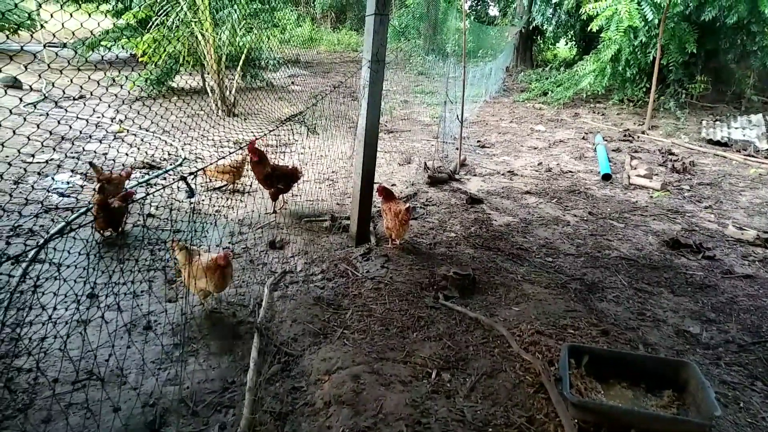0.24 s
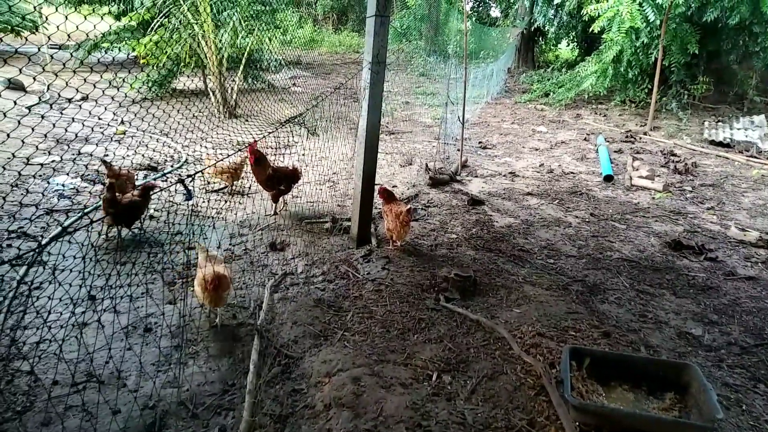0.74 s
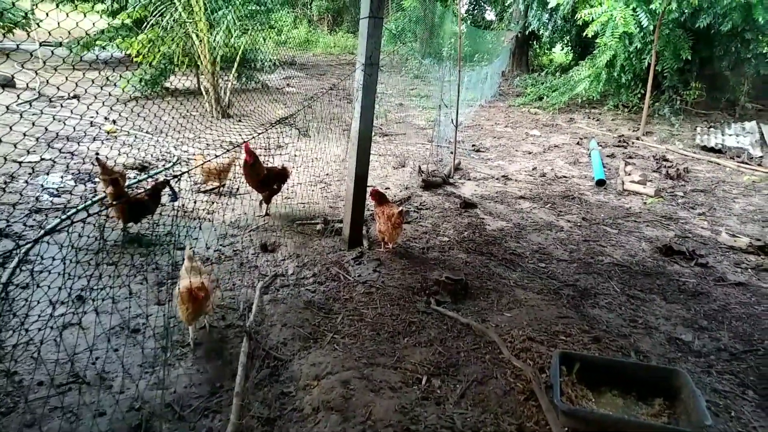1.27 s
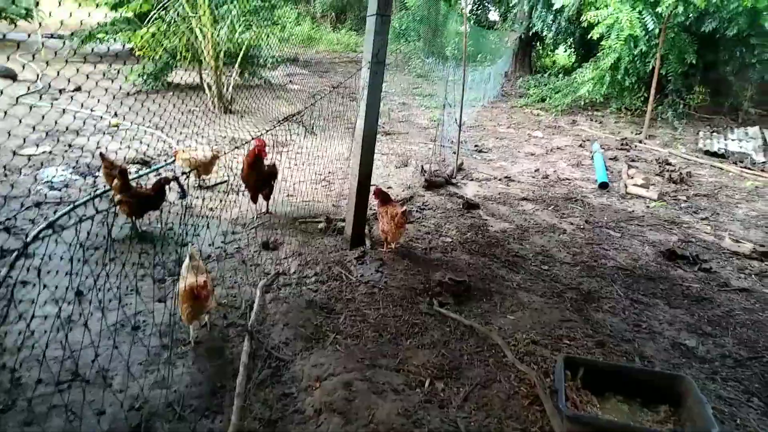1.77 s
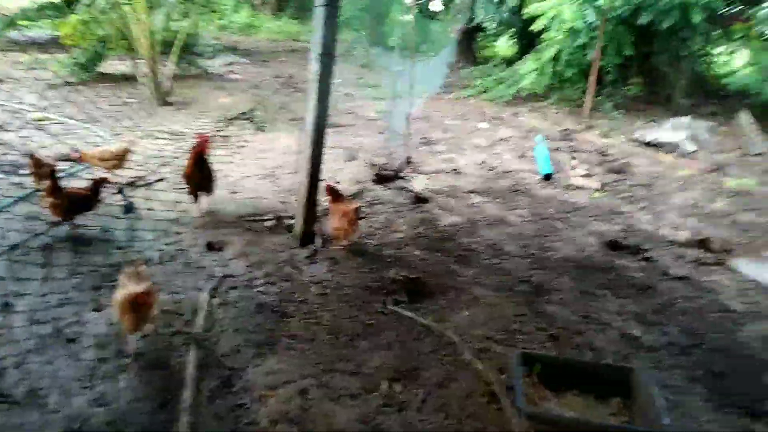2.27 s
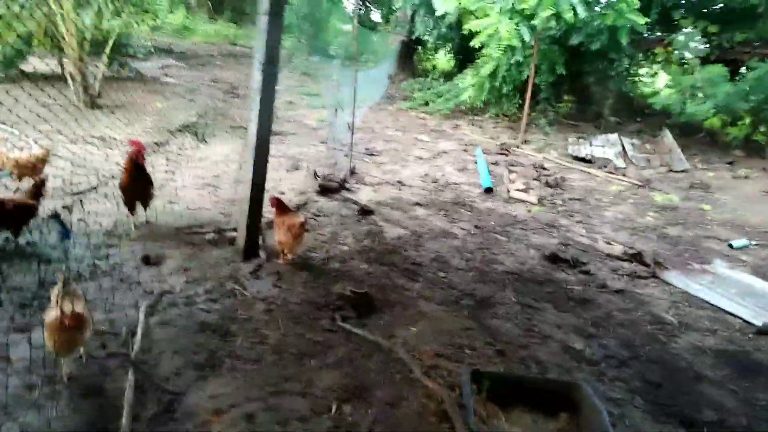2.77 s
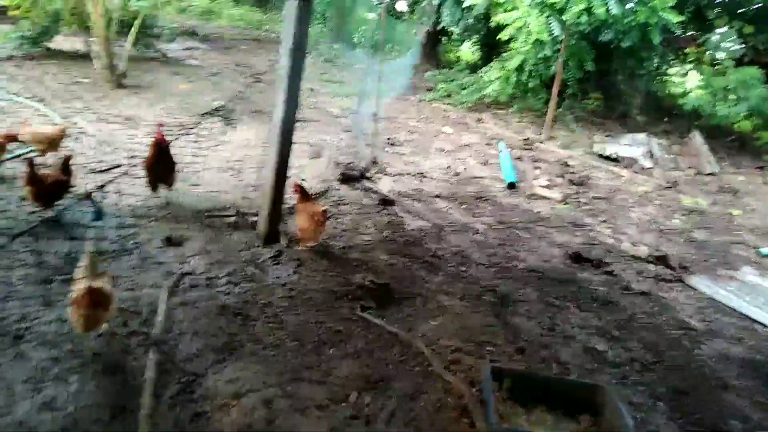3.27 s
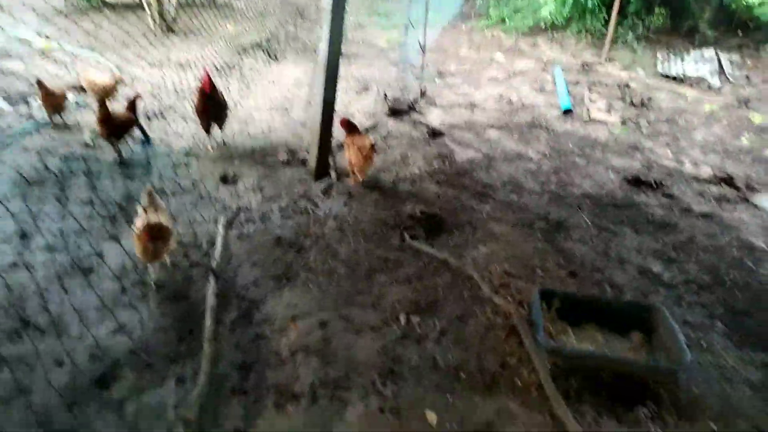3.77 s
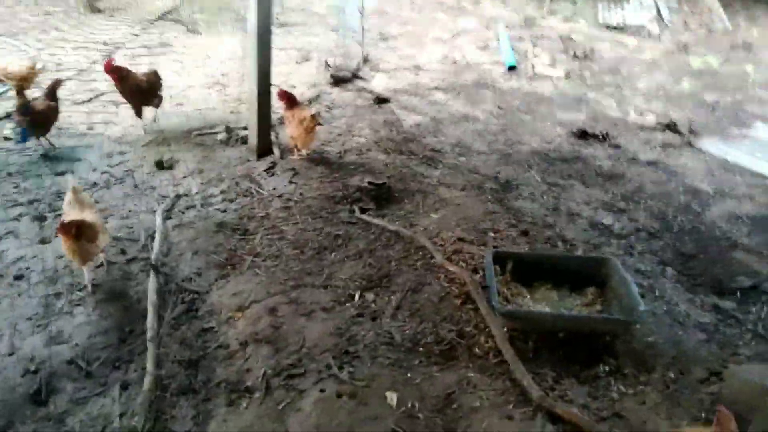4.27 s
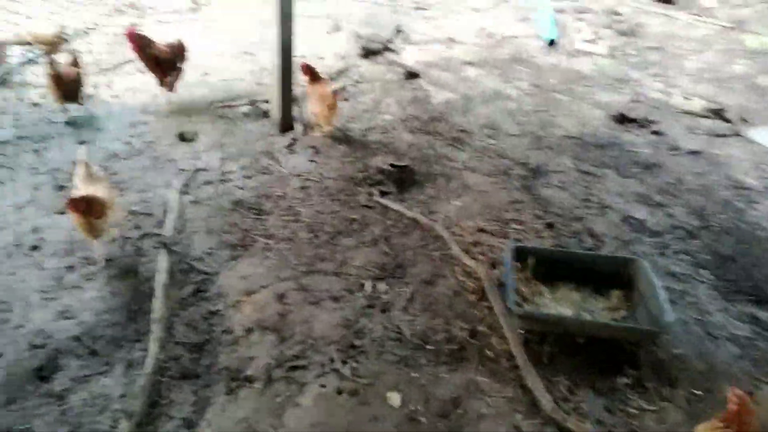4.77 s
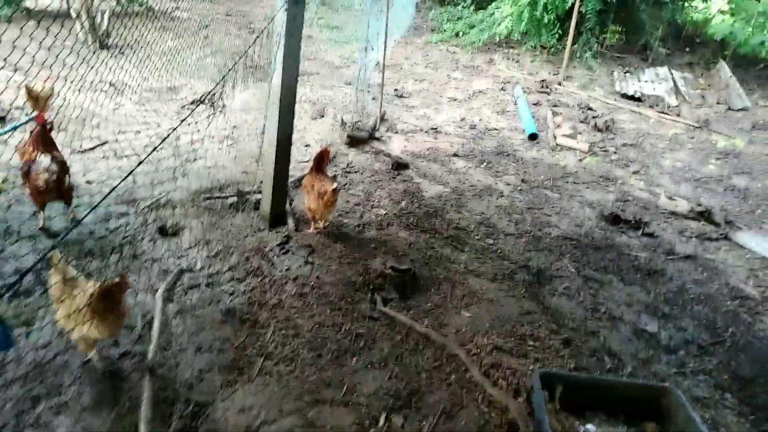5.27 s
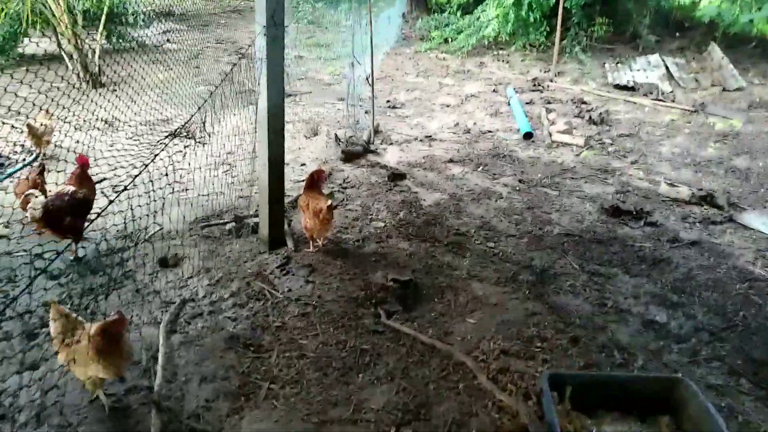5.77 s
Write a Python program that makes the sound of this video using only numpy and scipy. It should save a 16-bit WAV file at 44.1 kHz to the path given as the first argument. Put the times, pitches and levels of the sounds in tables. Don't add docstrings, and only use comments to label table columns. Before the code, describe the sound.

Distant hens whine and cluck amid insect chirps, pecks rattle on dirt, sound cuts out briefly, then two close hens squawk harshly.

```python
import sys
import numpy as np
from scipy import signal
from scipy.fft import rfft, irfft, next_fast_len
from scipy.io import wavfile
from scipy.ndimage import uniform_filter1d

SR = 44100
rng = np.random.default_rng(int(sys.argv[2]) if len(sys.argv) > 2 else 0)


def transcribe(u):
    v = np.clip(np.atleast_2d(u).T, -1, 1)
    q = np.round(v * 32767).astype(np.int16)
    wavfile.write(sys.argv[1], SR, q)


def invert_db(level):
    return 10 ** (np.asarray(level, dtype=float) / 20)


N = 266364

# start_s, end_s
SCENE_CHANGE = (5.158, 5.31)
LEAD_SAMPLES = 8
SIDES = np.array([[.5], [-.5]])

# frequency_hz, level_db (per Hz)
CICADAS = [(2900, -55.5), (3400, -38), (3800, -36), (4050, -8.5), (4460, -6), (5060, -4), (5500, -13),
           (6050, -15), (6500, 4.5), (7050, 2.5), (7700, -13), (8300, -26), (9300, -22), (12500, -39),
           (15200, -44)]
RUMBLE = [(50, -31.5), (80, 2.5), (140, 0.5), (220, -6), (320, -18.5), (500, -55)]
YARD = [(150, -38.5), (250, -8), (409, -11), (629, -6), (968, -11.5), (1060, -7), (1500, -9.5), (2900, -13),
        (3500, -24), (6380, -120)]
# frequency_hz, likeness (0-1)
LIKENESS = [(60, 0.16), (600, 0.51), (1500, 0.46), (6000, 0.3)]
# rest_db, rest_after_change_db, loudness_that_starts_it_db, rise_db_per_db
CICADA_RISE = (-70, -67.5, -65.5, 0.353)
RUMBLE_RISE = (-82.5, -78, -57, 0.378)
YARD_RISE = (-81, -70, -70, 0.4704)
# start_s, length_s, level_db
SCUFF = (5.03, .13, -71)

# start_s, rise_s, peak_db, start_pitch_hz, peak_pitch_hz, upward_spread_hz
CHIRPS = [
    (0.502, 0.024, -53.5, 5300, 5440, 806),
    (0.606, 0.06, -61, 4620, 4680, 30),
    (1.371, 0.033, -48, 5660, 5685, 900),
    (2.28, .03, -47, 5400, 5544, 805),
    (3.574, 0.087, -53.5, 4100, 5540, 250.8),
]
# start_s, peak_db, treble_db, bass_db, left_minus_right_db
KNOCKS = [
    (4.468, -40, -11, -30, 9),
    (4.527, -43, -30, 4, -1),
    (4.536, -31.5, -28, -19, -7),
    (4.542, -31.5, -28.5, -29, 13),
    (4.553, -21.5, -19.5, -27, -5),
    (4.558, -30.5, -22, -33, 22.5),
    (4.571, -32.5, -23, -40.5, -5),
    (4.591, -56, -21, -30, 5),
    (5.001, -40.5, -30, 3.5, 11.5),
]
SQUEAK_S = (3.64, 3.86, 3.95, 3.975)
SQUEAK_HZ = (1250, 1680, 1440, 1270)
# start_s, top_s, end_s, level_db
AFTER_HISS = (4.0, 4.2, 4.33, -82)
# start_s, peak_db, throat_hz, t60_s,
# left_minus_right_db
CLUCKS = [(0.004, -56, 923, 0.091, 4.5), (0.519, -39.5, 1095, 0.095, 6), (0.745, -36.5, 1680, 0.065, 5.5),
          (0.787, -44.5, 1470, 0.13, 4), (0.82, -30, 1450, 0.037, 2.5), (0.994, -44.5, 1340, 0.12, 5),
          (1.568, -50.5, 960, 0.1, 0), (1.755, -42, 1036, 0.12, 5.5), (1.822, -47, 2040, 0.096, 5),
          (1.914, -50.5, 1050, 0.16, 7.5), (2.409, -34, 1010, 0.16, 3.5), (2.466, -46, 1220, 0.085, -1),
          (2.535, -43.5, 1730, 0.11, 1), (2.689, -36, 1036, 0.13, 3), (3.174, -52.5, 996, 0.21, 10.5),
          (3.218, -48.5, 732, 0.16, 1), (3.249, -71, 648, 0.22, 1.5), (3.668, -53.5, 1870, 0.12, 8),
          (3.818, -61, 2260, 0.37, 13.5), (3.898, -56.5, 1750, 0.16, 8), (4.038, -62.5, 594, 0.064, -1),
          (4.054, -56, 760, 0.055, -1), (5.109, -52, 1210, 0.1, 8.5), (1.15, -62, 1820, 0.23, 9),
          (4.47, -46, 324, 0.021, 4)]

# frequency_hz, level_db
FAR_THROAT = [(300, -28), (530, -14.5), (785, -18.5), (1050, -0.5), (1580, -6), (2040, -25), (2150, -12),
              (2650, -26.5), (3200, -36), (3650, -52), (4200, -23), (4800, -43.5), (6800, -37), (8500, -63),
              (13000, -71)]
DEEP_THROAT = [(280, -27), (550, -8), (830, -8), (1100, 0), (1380, -4), (1650, -17), (2490, -26),
               (2770, -52), (3335, -18), (3900, -23), (4800, -29), (5250, -52), (5700, -30), (6800, -25),
               (8200, -42), (10000, -49), (13000, -54), (15000, -56)]
NEAR_THROAT = [(400, -20.5), (830, -5.5), (1250, 0), (1670, -18.5), (2100, -17), (2450, -26), (2780, -46.5),
               (3400, -24.5), (3850, -12.5), (4300, -25.5), (4800, -30), (5250, -48.5), (5750, -32),
               (6800, -27), (8200, -42.5), (10500, -57.5), (15000, -59.5)]
# frequency_hz, left_lag_radians
NO_LAG = [(100, 0), (8000, 0)]
DEEP_LAG = [(300, 0.6), (550, 0.32), (830, 1.56), (1100, 1.5), (1380, 1.07), (1900, 1.2), (3500, -1)]
HOARSE_LAG = [(400, 1.1), (830, 0.82), (1250, 0.94), (2100, 1.9), (3800, -1.3)]

# start_s, length_s, pitch_hz, high_partial_db, high_minus_low_partial_db
FAR_HEN = [
    (.72, 0.095, 589, -64.5, -3),
    (1.56, 0.22, 605.5, -58.5, 0),
]
SHRILL_HEN = [
    (.35, 0.1054, 750, -67.5, 28),
]
SOFT_HEN = [
    (1.25, 0.11, 310, -63.5, 20.5),
    (2.8, 0.17, 306.4, -85, -4.5),
    (5.682, 0.062, 287, -60.5, -13),
]
PIP = [
    (4.468, 0.062, 779, -86.5, -23.5),
]
COO = [
    (5.565, 0.115, 503, -81.5, -33.5),
]
RASP = [
    (5.325, 0.065, 1304, -54.5, -28),
    (5.752, 0.075, 1297, -43, 8.5),
]
# top_reached, top_held_until (shares of length), start_db, end_db, left_minus_right_db
FAR_NOTE = (.35, .7, -16, -12, 0)
SHRILL_NOTE = (.55, .66, -22, -20, 10)
SOFT_NOTE = (.36, .45, -14, -16, 2)
PIP_NOTE = (.1, .75, -10, -9, 6)
COO_NOTE = (-0.34, -0.12, -1, -18.5, 3)
RASP_NOTE = (.3, .6, -24, -18, -2)
LEVEL = (.985, 1.005)
SAGGING = (1, .97)
CLIMBING = (.97, 1.02)

# time_s, pitch_hz, effort_db, beak_brightness_db_per_octave
CLEAR_HEN = [
    [(1.503, 549, -57, -13), (1.517, 546, -39.5, -16), (1.56, 506, -51.5, -12), (1.7, 525.3, -40.5, -13),
     (1.75, 528, -61, -2), (1.79, 523, -72, -4)],
    [(1.88, 484.6, -60, 4.5), (1.94, 505.5, -47.5, 6), (2.01, 517.6, -44, 11), (2.11, 521.4, -34, -1),
     (2.132, 524, -35, -34), (2.145, 527.6, -59.5, -3)],
    [(2.285, 485, -66, 9), (2.31, 493, -47.5, 9), (2.35, 502.7, -39.5, 2.5), (2.5, 513.3, -37.5, 1.5),
     (2.61, 535, -32.5, 1), (2.632, 534.5, -40, 8.5), (2.66, 536, -36.5, 8), (2.73, 549.8, -38.5, 7.5),
     (2.76, 570, -71, -4)],
]
# under_effort_db, ceiling_db, chest_fill_s, missing_before_db,
# left_minus_right_db, turn_db_per_db of effort
CLEAR_CHEST = (-1.5, -46, 1, 1.5, 10.5, 1.04)
# time_s, pitch_hz, low_partial_db, high_partial_db,
# beak_brightness_db_per_octave
FAR_GLIDES = [
    [(.31, 579, -79, -77, 0), (.37, 602, -64, -66.5, 0), (.43, 589, -59.5, -69, 0),
     (.5, 612, -65.5, -82, 0), (.56, 644, -69, -94, 0), (.61, 670, -79, -90, 0)],
    [(1.1, 612, -70, -88, 0), (1.16, 597.6, -64.5, -70, 0), (1.28, 606, -64.5, -77, 0),
     (1.34, 575, -73, -85, 0)],
    [(1.37, 518, -76, -95, 0), (1.405, 537, -62, -63.5, 2), (1.43, 564, -76, -72, 0),
     (1.46, 576, -64, -52.5, 12), (1.51, 569, -66, -57.5, 0)],
]
SHRILL_GLIDES = [
    [(.61, 680, -59, -76, 0), (.65, 742, -74, -59, 0.0042), (.705, 743, -49, -41, 0),
     (.75, 742, -55, -49, 0), (.8, 725, -67, -71, 0)],
    [(.815, 700, -62, -72, 0), (.845, 708, -54.5, -62, 0), (.89, 700, -59.5, -63, 0),
     (.925, 713, -75, -72, 0)],
    [(.935, 748, -67, -69, 0), (1.01, 746, -61, -47.5, 0), (1.045, 748, -70, -59, 0),
     (1.07, 725, -64, -61, 0.007)],
    [(.96, 701, -60, -78, 0), (1.03, 702, -63.5, -67, 0), (1.09, 700, -61.5, -62.5, 0),
     (1.14, 650, -67, -70, 0)],
    [(1.08, 725, -86, -73, 0), (1.17, 722, -75, -67, 0), (1.33, 698, -90, -78, 0)],
]
DEEP_HEN = [
    [(5.31, 273.5, -64, -46, -2), (5.343, 272.7, -46.5, -34, -1), (5.349, 272, -40, -25.5, -3),
     (5.42, 279.3, -35.5, -23.5, 1), (5.46, 274.8, -34.5, -24, -2), (5.485, 267.5, -29, -24, -7),
     (5.505, 276, -55, -49, -3.5)],
    [(5.75, 273, -61, -60, 0), (5.78, 271, -50.5, -29, -1.7), (5.795, 266.6, -64, -27, -2),
     (5.82, 265.8, -47, -29, -2), (5.838, 267.3, -52, -41, 0), (5.87, 255, -43, -40.5, 0)],
    [(5.87, 278.8, -64, -45.5, 2), (5.898, 290.8, -30.5, -30, -2), (5.92, 308.8, -39, -48, 0),
     (5.945, 283, -40, -46.5, -10), (5.98, 287, -73.5, -65.5, -5)],
]
HOARSE_HEN = [
    [(5.44, 435.5, -39, -25, 0.0081), (5.462, 433, -39.5, -27.5, -0.79), (5.5, 411, -27.5, -21.5, 0.0077),
     (5.525, 416.3, -33.5, -21.5, -1.8), (5.542, 386.4, -34, -29.5, 0.16),
     (5.555, 403, -64.5, -49.5, -0.19), (5.59, 416, -87.5, -69, 0.0045)],
    [(5.79, 402, -51, -42, -4), (5.822, 410.7, -35, -25, 0), (5.843, 410, -34.5, -36.5, 2),
     (5.857, 412, -48, -20, -11), (5.866, 395, -42, -38, 3.5), (5.89, 407, -49, -29, 8.5)],
    [(5.9, 419, -47, -31.5, 9), (5.925, 424.7, -36, -26, 2.5), (5.955, 421.7, -34, -32, 9.5),
     (5.968, 406, -44, -38, 6), (5.985, 400, -59.5, -47, -9), (6.01, 397, -84, -80, -11)],
]
FAR_PANS = (0, 0, 0)
SHRILL_PANS = (13, 5, 6.6, 4.4, 5.1)
DEEP_PANS = (-0.37, 1, 2.8)
HOARSE_PANS = (-1.6, 1.5, 4)


def evened(x):
    return x / np.sqrt(np.mean(abs(x) ** 2) + 1e-20)


def read(points, hz):
    f, value = np.transpose(points)
    return np.interp(np.log(hz + 1), np.log(f + 1), value)


def columns(rows):
    s, *cols = np.transpose(rows)
    t = np.arange(s[0], s[-1], 1 / SR)
    return s[0], [np.interp(t, s, c) for c in cols]


def add(mix, s, sound):
    part = mix[:, round(s * SR):][:, :sound.shape[1]]
    part += sound[:, :part.shape[1]]


def drift(shape, hz):
    span = max(int(SR / hz / 2), 1)
    x = rng.standard_normal(shape[:-1] + (shape[-1] + 2 * span,))
    smooth = uniform_filter1d(uniform_filter1d(x, span), span)
    return smooth[..., span:span + shape[-1]] * np.sqrt(1.5 * span)


def resonate(x, hz, width):
    turn = np.exp(2j * np.pi * np.cumsum(hz * np.ones(x.shape[-1])) / SR)
    r = np.exp(-np.pi * width / SR)
    return 2 * (turn * signal.lfilter([1 - r], [1, -r], x / turn)).real


def resonate_twice(x, hz, first_width, second_width):
    return resonate(resonate(x, hz, first_width), hz, second_width)


def coloured(x, points):
    size = next_fast_len(x.shape[-1])
    gain = invert_db(read(points, np.fft.rfftfreq(size, 1 / SR)))
    return irfft(rfft(x, size) * gain, size)[..., :x.shape[-1]]


def dulled(x, hz):
    return signal.sosfilt(signal.butter(6, hz, fs=SR, output="sos"), x)


def late_right(x):
    return np.array([x[0], np.roll(x[1], LEAD_SAMPLES)])


def echoes(x, t60):
    length, spacing = SR // 3, 20
    taps = np.zeros((3, length))
    at = np.arange(300, length - 20, spacing) + rng.integers(0, spacing, (3, (length - 301) // spacing))
    np.put_along_axis(taps, at, rng.choice([-1., 1.], at.shape) * invert_db(-60 * at / SR / t60), 1)
    taps = taps[:2] + 0.89 * taps[2]
    return signal.fftconvolve(x.mean(0)[None], taps / np.linalg.norm(taps[0]), axes=1)[:, :N]


def rising(rule, heard):
    rest_db, later_db, threshold_db, share = rule
    power = uniform_filter1d(heard.mean(0) ** 2, round(.06 * SR))
    loud_db = 10 * np.log10(abs(power) + 1e-12)
    before = np.arange(N) < SCENE_CHANGE[1] * SR
    threshold_db = threshold_db + ~before * (later_db - rest_db) / share
    return np.where(before, rest_db, later_db) + share * np.maximum(loud_db - threshold_db, 0)


def wash(spectrum, level_db, lo_hz, hi_hz, patchy_db, flicker_db):
    frames, hz = N // 256 + 5, np.fft.rfftfreq(512, 1 / SR)
    a, b, c, d, patches = rng.standard_normal((frames, 257, 5)).T
    patches = evened(uniform_filter1d(uniform_filter1d(patches, 5, 0), 10, 1))
    flicker = evened(uniform_filter1d(rng.standard_normal(frames), 3))
    same = np.clip(read(LIKENESS, hz), -1, 1)[:, None]
    left = a + 1j * b
    right = same * left + np.sqrt(1 - same ** 2) * (c + 1j * d)
    z = np.array([left, right]) * invert_db(patchy_db * patches + flicker_db * flicker)
    window = np.sqrt(np.hanning(513)[:-1])
    noise = signal.istft(z, nperseg=512, noverlap=256, window=window)[1][:, :N]
    x = coloured(noise, spectrum)
    band = signal.sosfilt(signal.butter(4, [lo_hz, hi_hz], "band", fs=SR, output="sos"), x.mean(0))
    return late_right(x) / band.std() * invert_db(level_db)


def cicadas(calls):
    return wash(CICADAS, rising(CICADA_RISE, calls), 6300, 7300, patchy_db=1.5, flicker_db=1.1)


def rumble(calls):
    t = np.arange(N) / SR
    start, length, level_db = SCUFF
    early, late = np.maximum(start - t, 0), np.maximum(t - start - length, 0)
    scuff_db = level_db - 400 * early - 400 * late
    return wash(RUMBLE, np.maximum(rising(RUMBLE_RISE, calls), scuff_db), 70, 130, patchy_db=1.1, flicker_db=1.2)


def yard(calls):
    return wash(YARD, rising(YARD_RISE, calls), 300, 2100, patchy_db=0.5, flicker_db=1.5)


def chirps():
    out = np.zeros((2, N))
    for start, rise, top_db, first_hz, top_hz, spread_hz in CHIRPS:
        s, (db, hz, apart_hz) = columns([
            (start, top_db - 18, first_hz, 0),
            (start + rise, top_db, top_hz, 0.2 * spread_hz),
            (start + rise + .095, top_db - 12.5, top_hz, spread_hz)])
        throb = 1 + .5 * np.cos(2 * np.pi * 120 * np.arange(len(hz)) / SR)
        teeth = rng.standard_normal((2, len(hz)))
        note = evened(resonate_twice(teeth, hz, 150, 220))
        wider = .45 * spread_hz
        upper = evened(resonate_twice(teeth, hz + apart_hz, 150 + wider, 220 + wider))
        upper = upper * np.sqrt(apart_hz / spread_hz)
        add(out, s, invert_db(db) * evened((note + upper) * throb) * signal.windows.tukey(len(hz), .15))
    return out + invert_db(-7.5) * echoes(out, 0.22)


def squeak():
    t = np.arange(N) / SR
    hz = np.exp(np.interp(t, SQUEAK_S, np.log(SQUEAK_HZ)))
    arch = invert_db(np.interp(t, SQUEAK_S, [-6, 0, 0, -6], -99, -99))
    after = invert_db(AFTER_HISS[3]) * np.interp(t, AFTER_HISS[:3], [0, 1, 0])
    turns = np.cumsum(hz * (1 + .003 * drift(hz.shape, 200))) / SR
    lines = np.zeros((2, N))
    for k in range(7, 10):
        partial = np.cos(2 * np.pi * (k * turns + rng.random((2, 1))))
        lines += partial * invert_db(4.5 * drift(hz.shape, 30) - 2 * abs(k - 8))
    hiss = evened(resonate_twice(rng.standard_normal((2, N)), 7.3 * hz, 4200, 4200))
    squeal = invert_db(-80) * lines + invert_db(-76) * (hz / hz.max()) ** 2 * hiss
    return uniform_filter1d(arch, 400) * squeal + after * hiss


def knocks():
    out, t = np.zeros((2, N)), np.arange(6000) / SR
    thump_hz, drop_hz, settle_s = 117, 262, 0.0035
    for s, db, treble_db, bass_db, pan_db in KNOCKS:
        grit = rng.standard_normal(len(t)) + .5 * rng.standard_normal((2, len(t)))
        grit = grit + 9 * (t == 0)
        dirt = signal.lfilter([1, -1], [1, -.96], grit)
        body = evened(resonate(resonate(dirt, 730, 870), 740, 1000))
        body = body * (invert_db(-60 * t / 0.025) + invert_db(-16.0 - 60 * t / 0.073))
        crack = evened(resonate(resonate(grit, 4270, 3500), 4600, 3600))
        crack = crack * invert_db(treble_db + 8.5 - 60 * t / 0.023)
        turns = thump_hz * t + drop_hz * settle_s * (1 - np.exp(-t / settle_s))
        thump = np.sin(2 * np.pi * turns) * invert_db(bass_db - 60 * t / 0.1)
        add(out, s, invert_db(db - 10.0 + SIDES * pan_db) * dulled(body + crack + thump, 9200))
    return out


def clucks():
    out, t = np.zeros((2, N)), np.arange(4000) / SR
    for s, db, hz, t60, pan_db in CLUCKS:
        turns = np.cumsum(410 * (1 + 0.11 * drift(t.shape, 170))) / SR
        pulse_db = 3.9 * rng.standard_normal(len(t)) - 60 * t / (0.22 * t60)
        pulses = np.diff(np.floor(turns + 0.69), prepend=0) * invert_db(pulse_db)
        air = rng.standard_normal(len(t)) + 0.25 * rng.standard_normal((2, len(t)))
        puff = air * invert_db(-18.5 - 60 * t / t60)
        drive = pulses + puff * np.minimum(t / 0.0056, 1)
        throat = resonate_twice(drive, hz, 360, 610)
        beak = resonate(resonate_twice(drive, 1874, 2000, 2000), 1874, 2000)
        ring = dulled(throat + invert_db(-8.0) * beak, 2940)
        add(out, s - .001, invert_db(db + 4.5 + SIDES * pan_db) * ring / abs(ring).max())
    return late_right(out)


def long_calls(calls, chest):
    under_db, top_db, fill_s, late_db, pan_db, turn = chest
    hardest_db = max(row[2] for rows in calls for row in rows)
    shaped = []
    for rows in calls:
        call = []
        for s, hz, db, beak_db in rows:
            low_db = min(db - under_db, top_db) - late_db * np.exp(-(s - rows[0][0]) / fill_s)
            call.append((s, hz, low_db, db, pan_db + turn * max(db - hardest_db, -20), beak_db))
        shaped.append(call)
    return shaped


def notes(calls, shape, glide):
    (rise, hold, start_db, end_db, pan_db), (first, last) = shape, glide
    held = min(max(hold, rise + .01), .98)
    steps = [(0, first, start_db), (rise, 1, 0), (held, 1, 0), (1, last, end_db)]
    return [[(s + u * length, share * hz, db - beak_db + step_db, db + step_db, pan_db, 0)
             for u, share, step_db in steps]
            for s, length, hz, db, beak_db in calls]


def glides(calls, pans):
    return [[(s, hz, low_db, high_db, pan_db, beak_db) for s, hz, low_db, high_db, beak_db in rows]
            for rows, pan_db in zip(calls, pans)]


def hen(calls, throat, order, jitter, hoarse, breath_db, fade_db, tilt_db, push=.5, lag=NO_LAG, sway=0):
    out, (low, high) = np.zeros((2, N)), order
    hardest_db = max(row[3] for rows in calls for row in rows)
    for rows in calls:
        s, (hz, low_db, high_db, pan_db, beak_db) = columns(rows)
        n, k = len(hz), np.arange(1, int(7900 / hz.max()) + 1)[:, None]
        turns = np.cumsum(hz * (1 + jitter * drift((n,), 46))) / SR
        opening = np.clip((k - low) / (high - low), 0, 1)
        lift_db = (1 - opening) * (low_db - read(throat, low * hz))
        lift_db += opening * (high_db - read(throat, high * hz))
        octaves = np.log2(np.clip(k / high, 1, 2.5))
        lift_db += octaves * (tilt_db + beak_db + push * (high_db - hardest_db))
        paths = drift((2, len(k), n), 24.87)
        fades = invert_db(read(throat, k * hz) + lift_db + fade_db * np.clip(paths, -3, 1.5))
        flutter = 1 + hoarse * drift((len(k), n), 90)
        slips = jitter * 3.52 * k * drift((len(k), n), 120)
        offsets = np.clip(rng.standard_normal((len(k), 1)), -1, 1) * .4
        apart = SIDES[:, None] * np.minimum(k * hz.mean() / 4500, 1) ** 2 * offsets
        swaying = sway * np.minimum(k * hz / 1500, 1) ** 2 * paths[::-1]
        apart = apart + (swaying - SIDES[:, None] * read(lag, k * hz)) / (2 * np.pi)
        phase = k * turns + slips + rng.random((len(k), 1)) + apart
        tone = np.sqrt(2) * (fades * flutter * np.cos(2 * np.pi * phase)).sum(1)
        puffs = rng.standard_normal((2, n)) * (0.17 + np.exp(-(turns % 1) / 0.38))
        breath = evened(coloured(puffs, throat)) * invert_db(np.maximum(low_db, high_db) + breath_db)
        add(out, s, (tone + breath) * invert_db(SIDES * pan_db) * signal.windows.tukey(n, min(900 / n, 1)))
    return out


def far_hens():
    far = hen(long_calls(CLEAR_HEN, CLEAR_CHEST), FAR_THROAT, order=(1, 2), jitter=.0035, hoarse=.15,
              breath_db=-31, fade_db=2.0, tilt_db=0, push=1.0)
    thin = glides(FAR_GLIDES, FAR_PANS) + glides(SHRILL_GLIDES, SHRILL_PANS)
    thin += notes(FAR_HEN, FAR_NOTE, LEVEL) + notes(SHRILL_HEN, SHRILL_NOTE, SAGGING)
    thin += notes(PIP, PIP_NOTE, SAGGING) + notes(COO, COO_NOTE, SAGGING)
    far += hen(thin, FAR_THROAT, order=(1, 2), jitter=.006, hoarse=.35,
               breath_db=-17, fade_db=2.0, tilt_db=-24)
    far += hen(notes(SOFT_HEN, SOFT_NOTE, CLIMBING), FAR_THROAT, order=(1, 3), jitter=.008, hoarse=.2,
               breath_db=-22, fade_db=1.5, tilt_db=-24)
    return late_right(far)


def near_hens():
    near = hen(glides(DEEP_HEN, DEEP_PANS), DEEP_THROAT, order=(2, 4), jitter=.003, hoarse=.3,
               breath_db=-14, fade_db=1.6, tilt_db=-1, lag=DEEP_LAG, sway=.8)
    near += hen(glides(HOARSE_HEN, HOARSE_PANS), NEAR_THROAT, order=(2, 3), jitter=.0035, hoarse=.36,
                breath_db=-11, fade_db=1.6, tilt_db=-1, lag=HOARSE_LAG, sway=.7)
    near += hen(notes(RASP, RASP_NOTE, LEVEL), NEAR_THROAT, order=(1, 3), jitter=.005, hoarse=.45,
                breath_db=-13, fade_db=2.5, tilt_db=-14, lag=HOARSE_LAG, sway=.7)
    return near


def scene():
    calls = far_hens() + near_hens() + clucks()
    sources = calls + knocks()
    background = cicadas(calls) + rumble(calls) + yard(calls)
    return sources + invert_db(-12.0) * echoes(sources, 0.14) + chirps() + squeak() + background


def low_pass(x):
    return signal.sosfilt(signal.butter(12, 15380, fs=SR, output="sos"), x)


def record(dry):
    t = np.arange(N) / SR
    fade_out, fade_in = (SCENE_CHANGE[0] - t) / 0.0021, (t - SCENE_CHANGE[1]) / 0.005
    kept = np.clip(np.maximum(fade_out, fade_in), 0, 1)
    thin = signal.sosfilt(signal.butter(3, 75, "high", fs=SR, output="sos"), dry)
    return low_pass(thin * kept)


dry = scene()
out = record(dry)
transcribe(out)
```